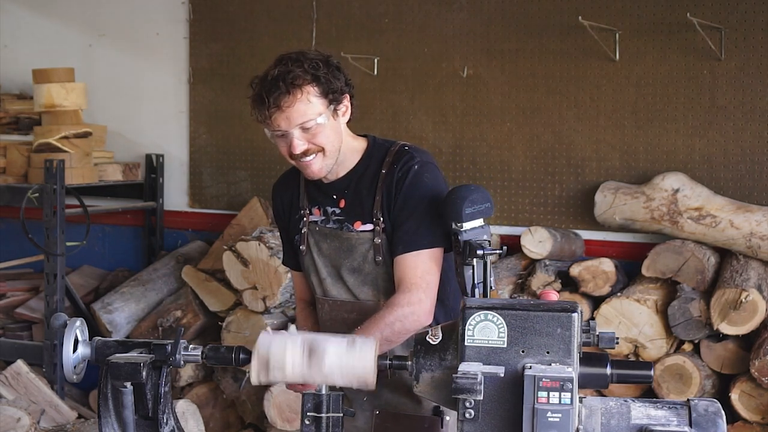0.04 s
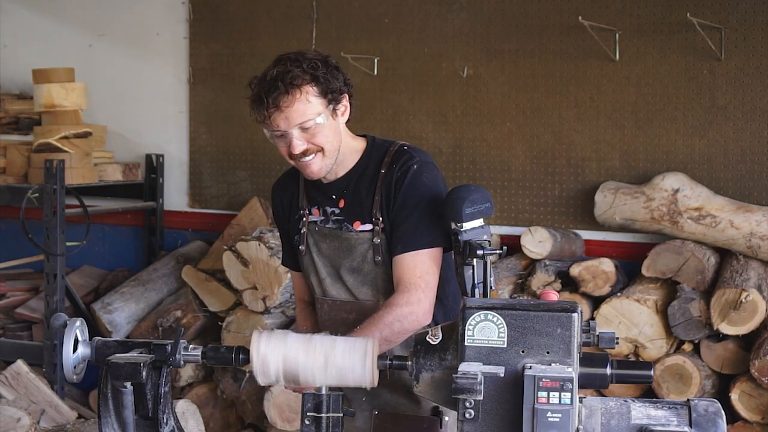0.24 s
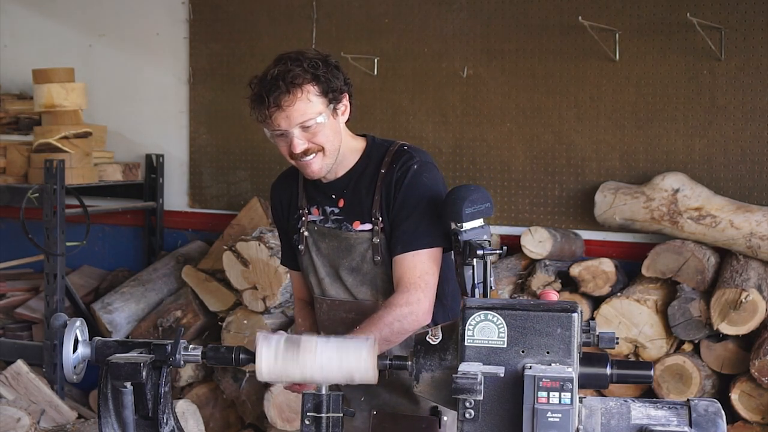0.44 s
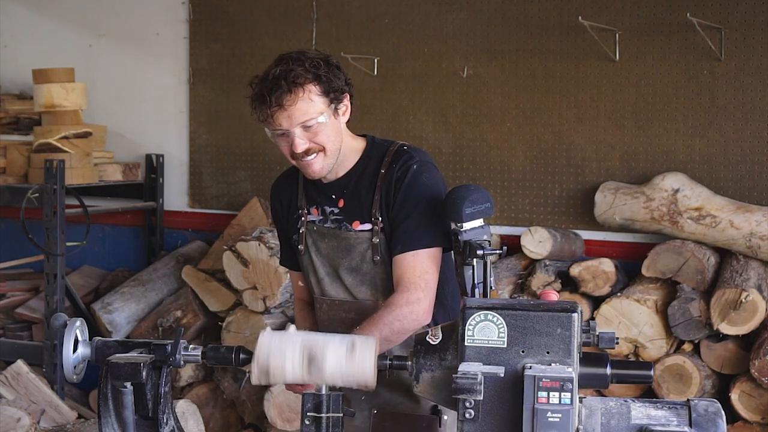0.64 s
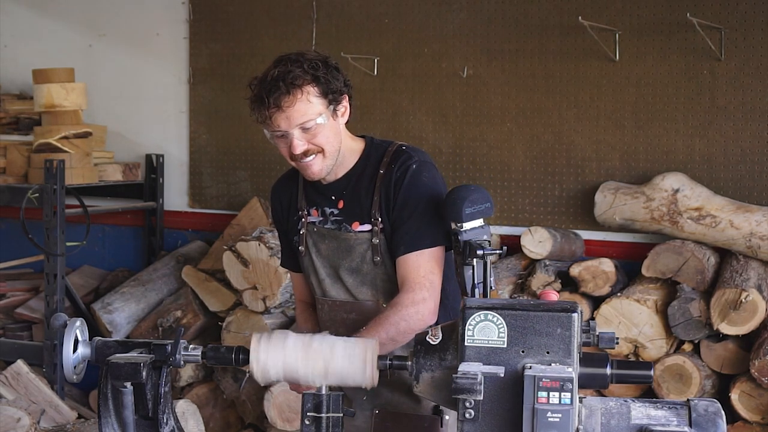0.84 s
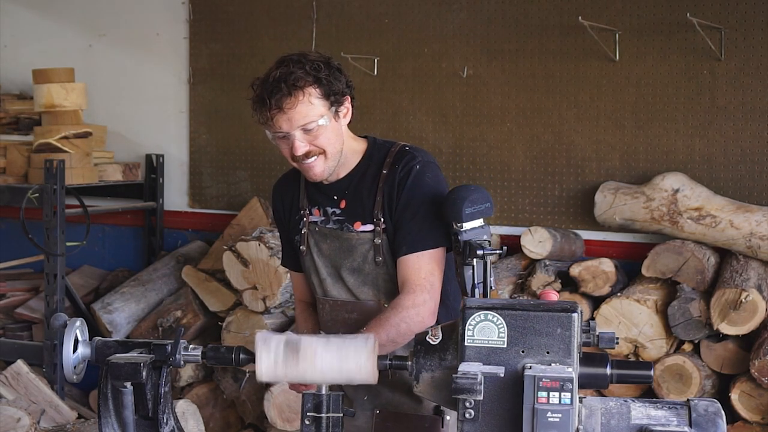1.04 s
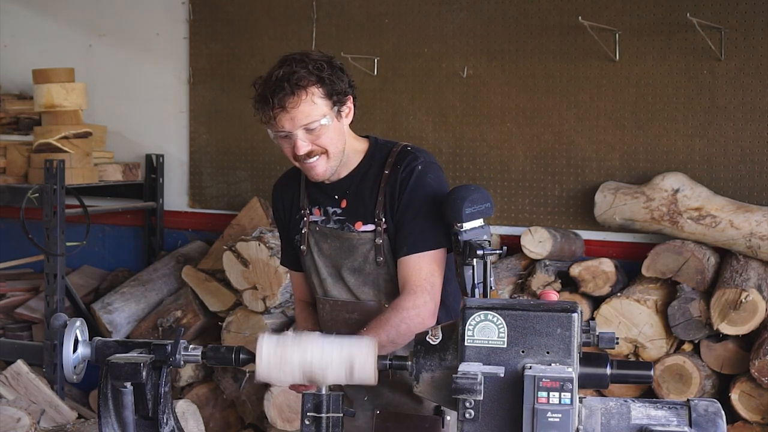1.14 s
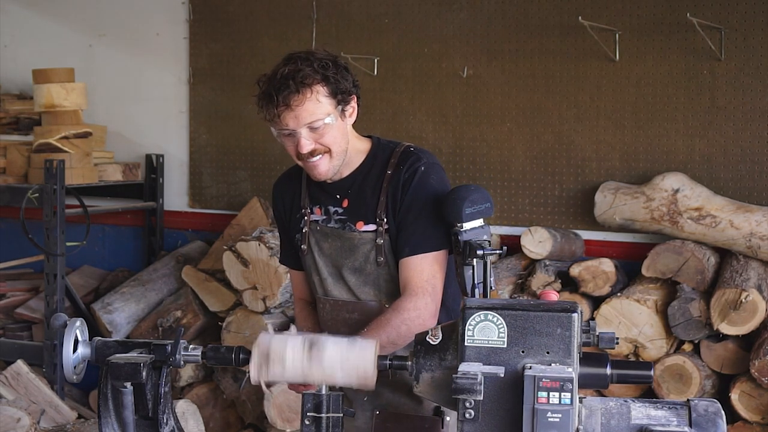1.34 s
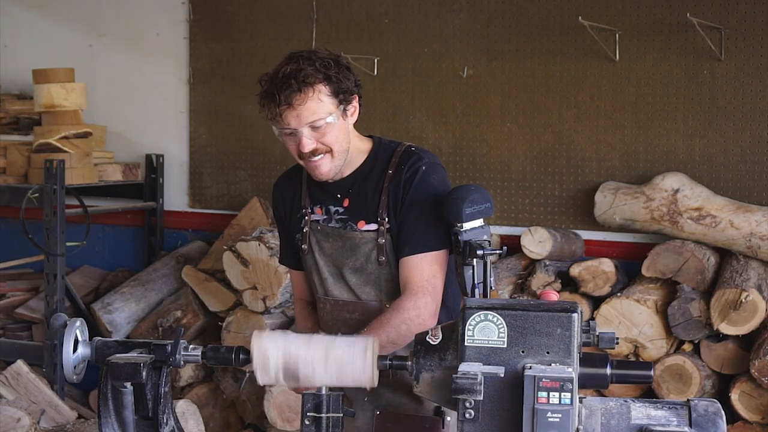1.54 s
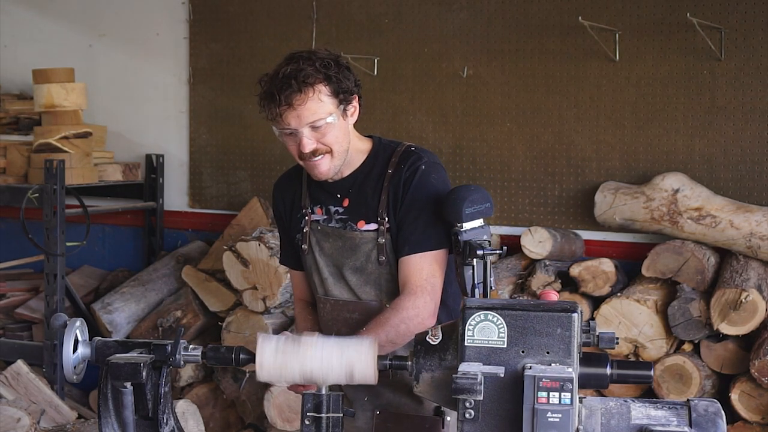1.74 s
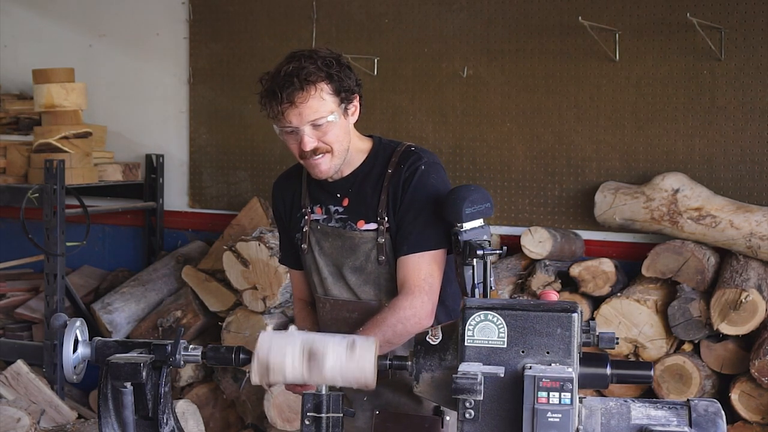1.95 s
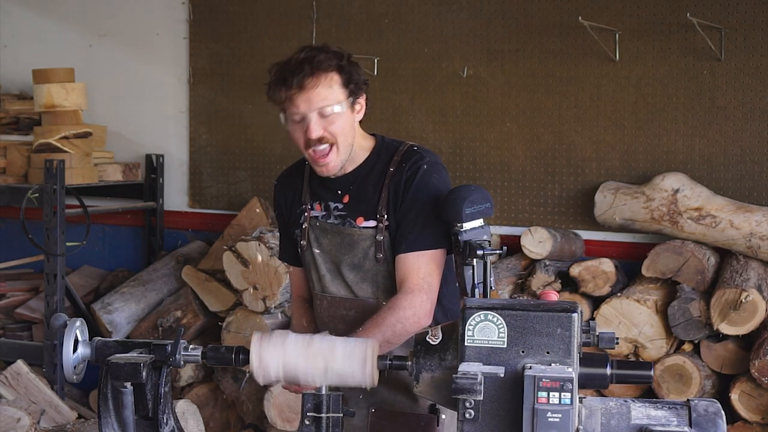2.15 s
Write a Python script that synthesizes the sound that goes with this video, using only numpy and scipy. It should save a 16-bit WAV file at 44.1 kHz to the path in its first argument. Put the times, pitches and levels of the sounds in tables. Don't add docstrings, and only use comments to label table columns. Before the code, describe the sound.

A gouge clatters rapidly against a spinning rough log on a wood lathe, in two passes

```python
import sys
import numpy as np
from scipy import signal
from scipy.fft import rfft, irfft, next_fast_len
from scipy.io import wavfile
from scipy.ndimage import uniform_filter1d, map_coordinates

SR = 44100
rng = np.random.default_rng(int(sys.argv[2]) if len(sys.argv) > 2 else 0)


def generate_wav(signal):
    frames = np.transpose(np.atleast_2d(signal))
    scaled = np.clip(frames, -1, 1) * 32767
    pcm = np.round(scaled).astype(np.int16)
    wavfile.write(sys.argv[1], SR, pcm)


def volts_from_db(level):
    exponent = np.asarray(level, float) / 20
    return 10 ** exponent


N = 97372

# start in seconds, tearing level in dB,
# rise before it in seconds, tearing length in seconds, thump level over the tearing in dB.
FIRST_PASS = [
    (-.028, -29.0, .002, 0.023, -3.0),
    (0.01, -31, 0.001, 0.017, -4),
    (0.0628, -21, 0.0088, 0.014, -5),
    (0.1413, -22.0, 0.00084, 0.02, -2.7),
    (0.2284, -23, 0.0012, 0.018, -4),
    (0.314, -21, 0.0015, 0.014, -4.5),
    (0.4012, -24, 0.0032, 0.018, -3),
    (0.489, -26, 0.002, 0.015, -3),
    (0.5423, -49, 0.011, 0.043, 11.5),
    (0.5787, -27.5, 0.0029, 0.011, -2.3),
]
SECOND_PASS = [(1.1368, -36.5, 0.0027, 0.011, -10.5), (1.1799, -36.5, 0.0042, 0.0091, -12),
               (1.2207, -21, 0.0029, 0.013, -11), (1.2683, -29.5, 0.0032, 0.019, -7),
               (1.3058, -26.5, 0.0015, 0.017, -2), (1.3537, -28, 0.00067, 0.015, -8),
               (1.3933, -33.5, 0.0016, 0.029, 3.5), (1.4395, -39, 0.0004, 0.038, 10.5),
               (1.4832, -34.5, 0.0028, 0.021, -1), (1.5257, -22, 0.0013, 0.012, -9),
               (1.5655, -30.5, 0.0012, 0.017, -2), (1.6128, -22.5, 0.0017, 0.012, -7),
               (1.6512, -28.5, 0.00094, 0.018, -2), (1.6996, -21, 0.0016, 0.015, -9),
               (1.7416, -22, 0.0062, 0.0082, -5.5), (1.7891, -27, 0.0062, 0.01, -5),
               (1.827, -23.5, 0.0044, 0.01, -5), (1.8744, -22.5, 0.0016, 0.018, -6.5),
               (1.9185, -14, 0.0078, 0.0086, -8.5), (1.9593, -22.5, 0.002, 0.02, 1),
               (2.0029, -17, 0.0027, 0.013, -13), (2.0575, -18, 0.0022, 0.0096, -7.5),
               (2.1415, -16.5, 0.0014, 0.0078, -10), (2.051, -27.5, 0.006, 0.011, -2.6)]
# frequency in Hz, width in Hz, level in dB.
FIRST_GOUGE_MODES = [(1974, 37, 0.5), (2437, 28, -2), (3770, 130, -2.5), (4790, 58, -0.5), (6000, 95, -6),
                     (6500, 67, -27), (7500, 220, -2), (8700, 73, -15), (9190, 134, -3.5), (11700, 94, -3)]
SECOND_GOUGE_MODES = [(2000, 37, -5), (2410, 35, 3), (3680, 67, -6), (4750, 80, 0), (6310, 120, -8),
                      (6940, 32, -5), (7070, 61, -4), (7830, 79, -6), (9680, 68, -9), (11400, 73, -12)]
LOG_MODES = [(177, 20, 3), (241, 22, 3), (323, 25, -2), (385, 25, -2), (459, 25, 0), (554, 35, -3),
             (675, 30, 2), (748, 35, 0), (795, 30, -2), (1060, 45, -2), (1255, 40, -4)]
# frequency in Hz, level per hertz in dB.
TEAR_SPECTRUM = [(530, -79), (900, -14), (1770, -8), (2360, -1), (3730, -5.5), (4100, -8), (7060, -7),
                 (12600, -6.5), (16000, -16)]
SCRAPE_SPECTRUM = [(500, -42), (1000, -2.5), (2000, -2), (3800, 4), (5000, -28), (9000, -25)]
FIRST_THUD_SPECTRUM = [(53, -51), (90, -8), (236, -1), (304, -2), (463, -4.5), (516, -3.5), (1600, -14),
                       (2080, -18), (3520, -120)]
SECOND_THUD_SPECTRUM = [(53, -43), (90, -5.5), (172, -1.5), (391, -0.5), (516, -2.5), (672, -1),
                        (1600, -9.5), (2080, -55), (3520, -120)]
# start in seconds, level in dB, pitch in Hz, decay by 60 dB in seconds.
KNOCKS = [(1.22, -20, 1075, 0.045), (1.527, -30.5, 1297, 0.12), (1.921, -25, 1005, .07),
          (1.921, -17, 755, .12), (1.9375, -26, 705, 0.026), (1.942, -17, 693, .03),
          (.149, -23.5, 467, 0.075), (0.1419, -20.5, 7480, 0.041), (.317, -27.5, 2010, 0.081),
          (0.4933, -27.5, 7250, 0.047), (1.222, -26, 6250, 0.048), (1.305, -26, 2380, .1),
          (1.353, -27, 4780, .025), (1.394, -28, 2410, .17), (1.525, -35, 6870, 0.069),
          (1.614, -25, 4730, 0.055), (1.701, -23, 4860, 0.039), (1.702, -18, 3780, .05),
          (1.741, -21.5, 7150, 0.038), (1.828, -24, 2410, .13), (1.9145, -17, 6940, 0.07),
          (1.9205, -14, 6960, .09), (2.001, -17.5, 7050, 0.037), (2.011, -35, 7060, 0.034),
          (2.003, -21, 2410, .12), (2.057, -10.5, 3640, .035), (2.062, -16.5, 7355, .035),
          (2.1413, -16, 7840, 0.031), (1.2205, -20, 3000, .012), (1.3535, -27, 6500, .012),
          (1.5258, -27, 3060, .012), (1.269, -33, 4760, 0.034), (1.309, -29, 4720, 0.046),
          (1.655, -29, 2377, 0.076), (1.79, -25.5, 2416, 0.072), (2.142, -22.5, 2285, 0.052),
          (.066, -22, 3710, .04), (.152, -30, 3700, 0.044), (1.965, -17.5, 683, 0.09),
          (1.137, -35.5, 2386, 0.069), (.5785, -25, 6000, .015), (1.137, -39, 650, .12),
          (2.142, -26, 243, .2), (1.222, -31, 175, .2), (1.916, -21, 2410, .12), (1.702, -28, 2300, .1)]
# start in seconds, peak level in dB.
PINGS = [
    (0.202, -18),
    (0.277, -17),
    (0.368, -23),
    (0.451, -16),
    (0.542, -15),
    (1.413, -16),
    (1.495, -22),
    (1.6684, -17),
]
# frequency in Hz, decay by 60 dB in seconds.
SHOP_DECAY = [(100, 0.63), (400, 0.55), (1500, 0.4), (5000, 0.28), (12000, 0.073)]
# frequency in Hz, lead of the left port in radians.
PORT_TWIST = [(1500, 0), (2600, 1.79), (3600, 1.34), (5000, 0.17)]
# frequency in Hz, level per hertz in dB.
SHAKE_SPECTRUM = [(15, -3), (30, -3), (60, -3), (110, -24), (200, -87)]
# frequency in Hz, rms level in dB.
DRIVE_TONES = [(3919, -68.5), (4081, -70), (7752, -72), (7876, -76), (7946, -58.5), (8000, -65),
               (8053, -76), (11919, -75), (12026, -72), (12139, -73), (15558, -92)]
# start in seconds, peak level in dB.
FANNED_PUFFS = [
    (0.65, -36),
    (0.73, -42),
    (0.822, -40.5),
    (0.96, -45),
    (0.998, -37),
    (1.05, -53),
]
# frequency in Hz, level per hertz in dB.
SWISH_SPECTRUM = [(1500, -18), (3000, -2.5), (4300, -11), (6500, 2.5), (9000, -6.5), (14000, -18)]
AIR_SPECTRUM = [(12, -31), (20, 18.5), (410, -3), (2080, -7), (3530, -16), (7110, -15), (7950, 2.5),
                (9140, -22.5), (16000, -22)]

LEFT_DB = -5
EARLY_S = 0.0035
SIDE = np.array([[1], [-1]])


def unit(x):
    return x / np.sqrt(np.mean(x ** 2) + 1e-20)


def along(points, hz):
    f, v = np.transpose(points)
    return np.interp(np.log(hz + 1), np.log(f + 1), v)


def filtered(x, response):
    n = x.shape[-1]
    m = next_fast_len(n + SR // 5)
    return irfft(rfft(x, m) * response(np.fft.rfftfreq(m, 1 / SR)), m)[..., :n]


def wobble(rate, size):
    return map_coordinates(rng.standard_normal(size), [np.arange(size) * rate / SR])


def ringing(modes, f, gain_db, wider, scatter_db):
    response = 1
    for hz, width, db in modes:
        hz = hz * (1 + 0.01 * rng.standard_normal())
        level = volts_from_db(db + gain_db + scatter_db * rng.standard_normal())
        damping = 1j * f * width * wider
        response = response + level * damping / (hz * hz - f * f + damping)
    return response


def level_over(x, seconds):
    return np.sqrt(np.sum(x ** 2) / SR / seconds)


def cut(db, rise, length, thump_db, gouge_modes, thud_spectrum):
    size = SR // 5
    t = np.arange(size) / SR
    length = length - EARLY_S
    after = np.maximum(t - rise - length, 0)
    fade_out = np.minimum((t[-1] - t) * 20, 1)
    grow = np.minimum(t / rise, 1) ** 1.23 * fade_out

    snaps = rng.random(size) < 18000 / SR
    strength_db = -1.5 * np.log(1 - rng.random(size))
    cracks = snaps * rng.standard_normal(size) * volts_from_db(strength_db)

    sag_db_per_s, fall_t60_s = 262, 0.016
    bite = volts_from_db(-60 * after / fall_t60_s - sag_db_per_s * np.clip(t - rise, 0, length))
    chips = volts_from_db(-18.5 - 60 * t / 0.41)
    shape = grow * (bite + chips) * volts_from_db(1.8 * wobble(321, size))
    modes = [*gouge_modes, (7130, 88, 1.5 * (db + 8))]
    tear = filtered(cracks * shape, lambda f: volts_from_db(along(TEAR_SPECTRUM, f)) * ringing(
        modes, f, gain_db=1.5, wider=3.45, scatter_db=2.2))

    thud_t60_s, scrape_t60_s = 0.2, 0.34
    push = rng.standard_normal(size) * grow * volts_from_db(-60 * after / thud_t60_s + 0.8 * wobble(148.5, size))
    thud = filtered(push, lambda f: volts_from_db(along(thud_spectrum, f)) * ringing(
        LOG_MODES, f, gain_db=0, wider=1, scatter_db=1))

    drag = cracks[::-1] * grow * volts_from_db(-60 * after / scrape_t60_s + 2.4 * wobble(188, size))
    scrape = filtered(drag, lambda f: volts_from_db(along(SCRAPE_SPECTRUM, f)))

    tear = tear / level_over(tear, length + rise / 3)
    scrape = volts_from_db(-12) * scrape / level_over(scrape, 0.016)
    thud = volts_from_db(thump_db) * thud / level_over(thud, 0.022)
    return volts_from_db(db - 2) * (tear + scrape + thud)


def knocks():
    size = SR // 5
    t, out = np.arange(size) / SR, np.zeros(N + SR)
    for s, db, hz, t60 in KNOCKS:
        rough = 1 + 0.35 * wobble(400, size)
        onset = 1 - np.exp(-t / 0.0005)
        decay = volts_from_db(db + 0.5 - 60 * t / t60)
        start = round(s * SR)
        out[start:start + size] += decay * onset * rough * np.sin(2 * np.pi * hz * t)
    return out[:N]


def shop(x, tail_db=0):
    size, delay_s, echoes = SR // 2, 0.0083, 16
    hz, t, z = signal.stft(rng.standard_normal((2, size)), SR, nperseg=256)
    decay = volts_from_db(-60 * t / along(SHOP_DECAY, hz)[:, None])
    tail = signal.istft(z * decay, SR, nperseg=256)[1][:, :size]
    tail = tail * (np.arange(size) > delay_s * SR)
    answer = volts_from_db(-6 + tail_db) * tail / np.linalg.norm(tail[0])
    for ear in answer:
        at = (3 + rng.random(echoes) * EARLY_S * SR).astype(int)
        np.add.at(ear, at, volts_from_db(-0.9) * rng.standard_normal(echoes) / np.sqrt(echoes))
    return signal.fftconvolve(x[None], answer, axes=1)


def at_ports(direct, wet):
    lead_s, one_sided_hz = 1.5e-5, 306
    pair = filtered(direct, lambda f: np.exp(1j * np.pi * SIDE * f * lead_s)) + wet
    pair = filtered(pair, lambda f: volts_from_db(SIDE * LEFT_DB / 2 * f / (f + one_sided_hz))
                    * np.exp(1j * SIDE * along(PORT_TWIST, f) / 2))
    return filtered(pair, lambda f: 1 - 0.7 * np.exp(-((f - 4170) / 130) ** 2))


def bench_shake(pair):
    power = uniform_filter1d(uniform_filter1d(pair[0] ** 2, SR // 10), SR // 10)
    effort = np.sqrt(np.abs(power))
    spectrum = [*SHAKE_SPECTRUM, (400, -120)]
    shake = unit(filtered(rng.standard_normal((2, len(effort))), lambda f: volts_from_db(along(spectrum, f))))
    return volts_from_db(-14) * effort * (SIDE * shake[0] + 0.34 * shake[1])


def gouge():
    pad = SR // 10
    direct, wet = np.zeros(N + 2 * SR), np.zeros((2, N + 2 * SR))
    passes = ((FIRST_PASS, FIRST_GOUGE_MODES, FIRST_THUD_SPECTRUM),
              (SECOND_PASS, SECOND_GOUGE_MODES, SECOND_THUD_SPECTRUM))
    for rows, modes, thud_spectrum in passes:
        for s, db, rise, length, thump_db in rows:
            x = cut(db, rise, length, thump_db, modes, thud_spectrum)
            i = pad + round((s - rise) * SR)
            direct[i:i + len(x)] += x
            answer = shop(x)
            wet[:, i:i + answer.shape[1]] += answer
    x = knocks()
    direct[pad:pad + N] += x
    wet[:, pad:pad + N] += shop(x, tail_db=-7)[:, :N]
    pair = at_ports(direct, wet)
    return (pair + bench_shake(pair))[:, pad:pad + N]


def pings():
    start_hz, fall_hz_per_s, ping_s = 9100, 330000, 0.005
    t, out = np.arange(N) / SR, 0
    for s, db in PINGS:
        u = np.clip(t - s, 0, 0.05)
        hz = start_hz * (1 + 0.011 * rng.standard_normal())
        tone = np.sin(2 * np.pi * (hz - fall_hz_per_s * u / 2) * u)
        swell = u / ping_s * np.exp(-(u / ping_s) ** 2)
        out = out + volts_from_db(db - 10) * tone * swell * wobble(900, N)
    return out * volts_from_db(SIDE * LEFT_DB / 2)


def drive():
    t, out = np.arange(N) / SR, 0
    for hz, db in DRIVE_TONES:
        blur = np.array([wobble(130, N), wobble(130, N)])
        phase = rng.random() + 0.77 * rng.random((2, 1))
        out = out + volts_from_db(db + 2.5) * (1 + 1.1 * blur) * np.sin(2 * np.pi * (hz * t + phase))
    return out


def swish():
    rise_s, t60_s = 0.012, 0.28
    t, puffs = np.arange(N) / SR, 0
    for s, db in FANNED_PUFFS:
        decay = volts_from_db(db - 10 - 60 * np.maximum(t - s, 0) / t60_s)
        puffs = puffs + decay * np.clip((t - s) / rise_s, 0, 1)
    noise = rng.standard_normal((2, N)) + rng.standard_normal(N)
    rush = unit(filtered(noise, lambda f: volts_from_db(along(SWISH_SPECTRUM, f))))
    return puffs * rush * volts_from_db(1.5 * wobble(120, N))


def shop_air():
    noise = rng.standard_normal((2, N)) + 0.57 * rng.standard_normal(N)
    air = unit(filtered(noise, lambda f: volts_from_db(along(AIR_SPECTRUM, f))))
    return volts_from_db(-52 + 1.5 * wobble(14, N)) * air


def scene():
    return gouge() + pings() + drive() + swish() + shop_air()


def top_cut(x):
    return signal.sosfilt(signal.butter(12, 16650, fs=SR, output="sos"), x)


def record(dry):
    ceiling, top_hz = 1.1, 15750
    held = dry / (1 + np.abs(dry / ceiling) ** 4) ** 0.25
    mix = filtered(held, lambda f: f < top_hz)
    return top_cut(mix)


dry = scene()
out = record(dry)
generate_wav(out)
```